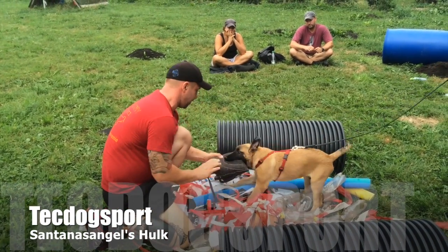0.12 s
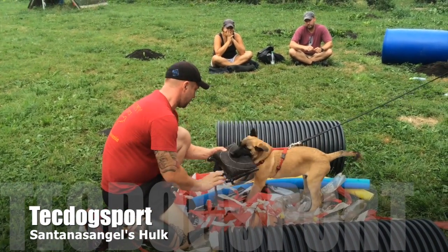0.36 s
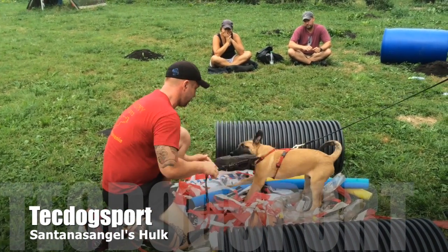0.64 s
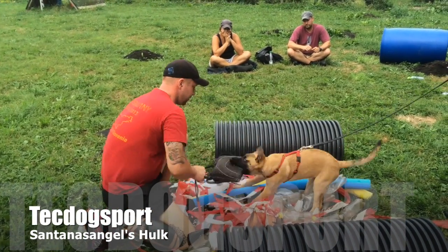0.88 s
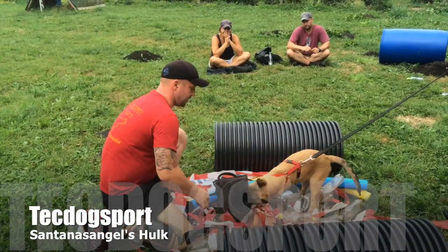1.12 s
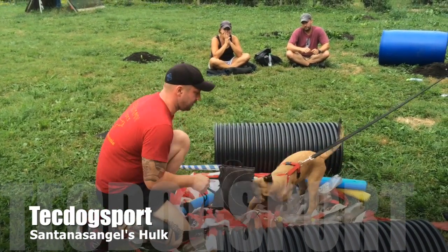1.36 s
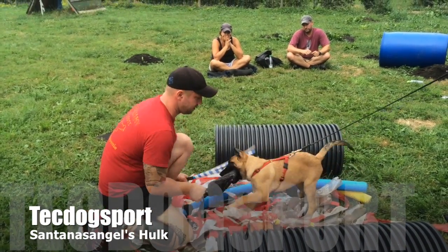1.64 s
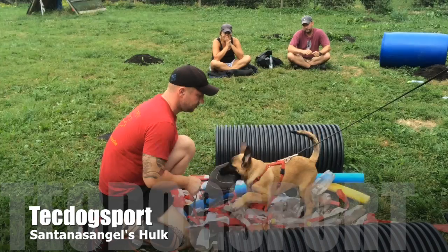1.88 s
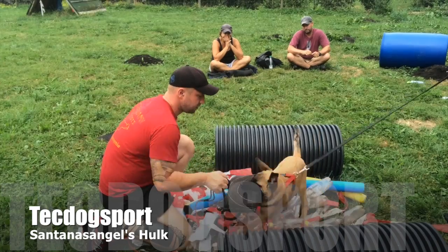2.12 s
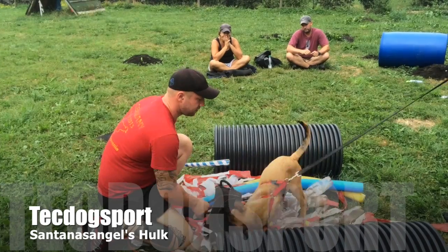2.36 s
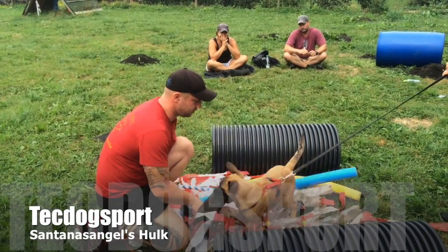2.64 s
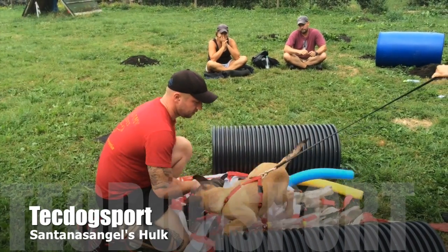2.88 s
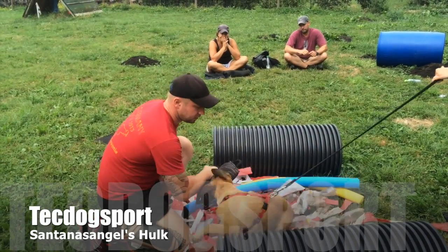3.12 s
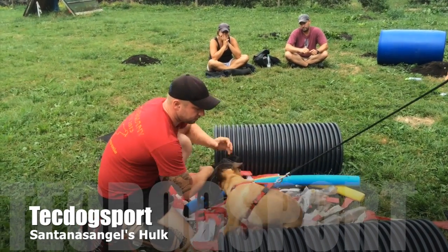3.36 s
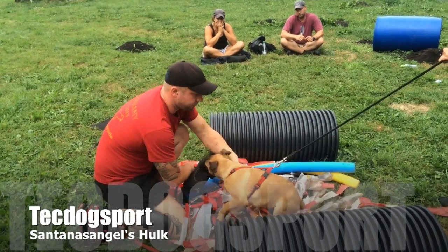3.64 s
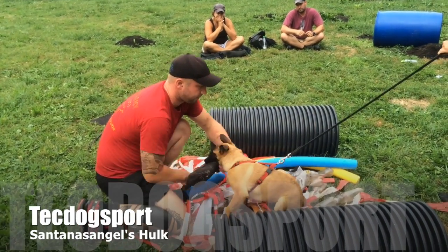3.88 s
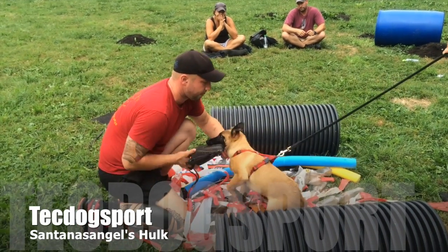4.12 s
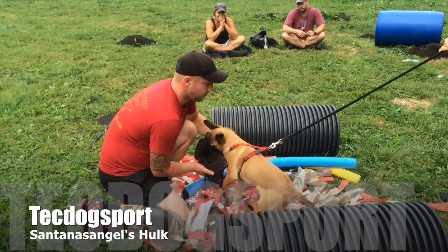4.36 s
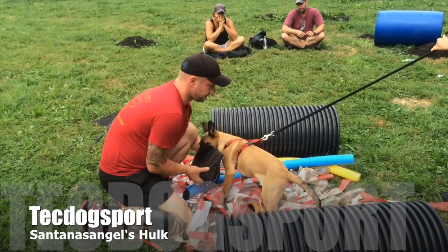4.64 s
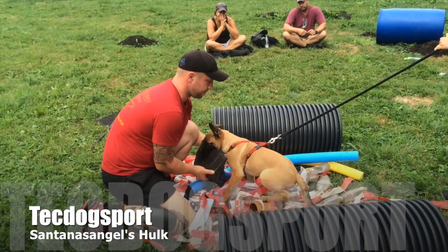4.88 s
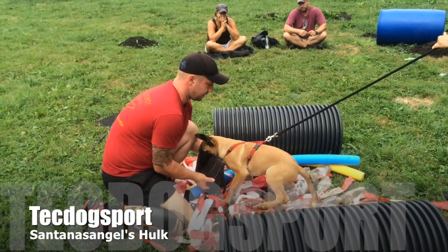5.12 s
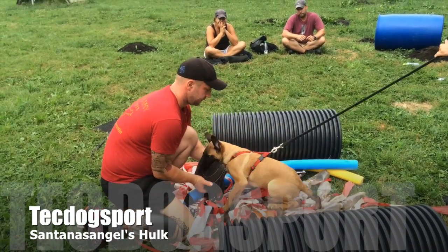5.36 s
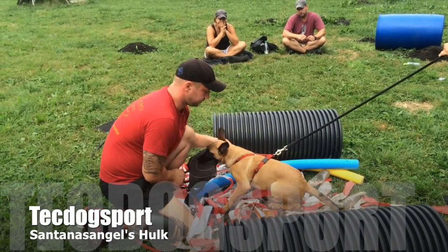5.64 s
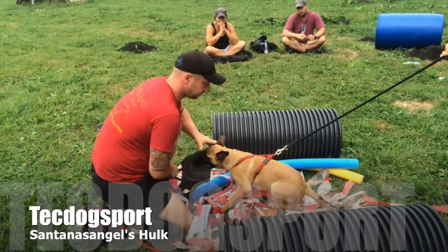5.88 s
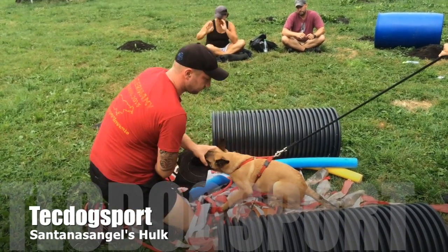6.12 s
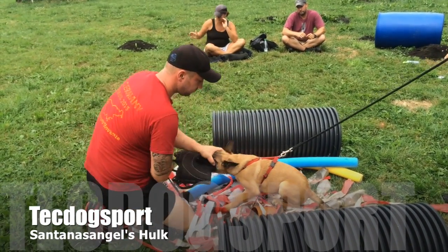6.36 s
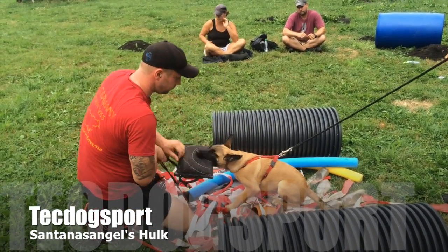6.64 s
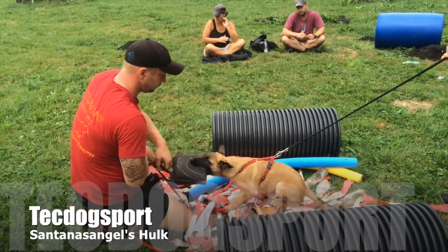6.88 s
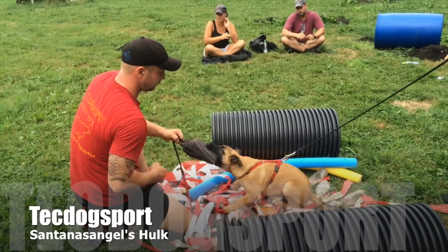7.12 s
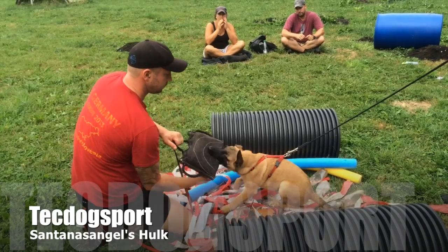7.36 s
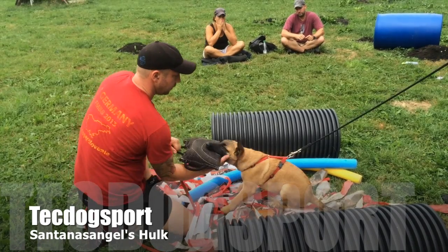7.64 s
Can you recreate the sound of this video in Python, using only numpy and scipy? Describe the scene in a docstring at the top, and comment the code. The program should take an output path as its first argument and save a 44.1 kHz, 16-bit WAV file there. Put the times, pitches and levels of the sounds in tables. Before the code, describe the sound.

Close outdoor sound of a dog on a pile of empty plastic bottles and sheeting. Faint rustling and soft scuffing come first, then hollow dents, bright snaps and four hard slaps build into dense crunching. It thins, flares once more, then falls to sparse light crackles with small clinks of the lead's clip.

```python
"""Dog trampling plastic bottles

A dog tramples a heap of empty plastic bottles and sheeting on grass while tugging at a toy.
Bottles dent with hollow rings and bright snaps, over a shifting rustle made of crackling noise and short knocks.
Four flat slaps push air and crack; the steel clip and ring of the lead clink as sums of fading sines.
Soft scuffing, a low breeze and faint hiss are coloured noise; the dents and clinks reflect once off the ground.
"""
import sys
import numpy as np
from scipy import signal
from scipy.fft import rfft, irfft
from scipy.io import wavfile
from scipy.ndimage import map_coordinates

SR = 44100
rng = np.random.default_rng(int(sys.argv[2]) if len(sys.argv) > 2 else 0)


def nominal_scale(level):
    """Amplitude ratio for a level in decibels (scalar or array-like)."""
    x = np.asarray(level, float) / 20
    return 10 ** x


def materialize(psi):
    """Save the field psi as 16-bit PCM at rate SR to the path in sys.argv[1].

    A 1-D psi becomes a single channel; in a 2-D psi each row is a channel.
    """
    bounded = np.clip(np.atleast_2d(psi).T, -1, 1)
    quanta = np.round(bounded * 32767).astype(np.int16)
    wavfile.write(sys.argv[1], SR, quanta)


N = 341334

# tone colour of bright cracks in plastic: pitch_hz, level_db (per Hz)
CRACK_COLOUR = [(500, -54), (1000, -2), (2100, -4.5), (3400, -1.5), (5000, -2), (8000, -5.5), (12000, -7),
                (15400, -16), (16000, -45)]
# tone colour of the hollow bottles: pitch_hz, level_db (per Hz)
HOLLOW_COLOUR = [(60, -50), (100, -11.5), (157, 2), (300, -5), (530, -4.5), (800, -10), (1100, -9.5),
                 (1600, -13), (2500, -17), (6000, -55)]


def unit(x):
    """Scale a sound to an average strength (rms) of 1."""
    return x / np.sqrt(np.mean(x ** 2) + 1e-20)


def wobble(rate):
    """A smooth random curve through this many random points a second."""
    points = rng.standard_normal(int(N * rate / SR) + 4)
    return map_coordinates(points, [np.arange(N) * rate / SR])


def coloured(x, spectrum):
    """Filter a sound to a tone colour, without sound ahead of its cause; white noise keeps its power."""
    size = 4096
    pitch_hz, level_db = np.transpose(spectrum)
    log_hz = np.log(np.fft.rfftfreq(size, 1 / SR) + 1)
    gain = nominal_scale(np.interp(log_hz, np.log(pitch_hz), level_db)) + 1e-6
    # folding the cepstrum puts the filter's energy as early as possible (minimum phase)
    cepstrum = irfft(np.log(gain))
    cepstrum[1:size // 2] *= 2
    cepstrum[size // 2 + 1:] = 0
    kernel = irfft(np.exp(rfft(cepstrum)))
    return signal.fftconvolve(x, kernel / np.linalg.norm(kernel))[:len(x)]


def add(track, start_s, sound):
    """Mix a sound into a track at a time, cut off at the track's end."""
    part = track[round(start_s * SR):][:len(sound)]
    part += sound[:len(part)]


def crackle(n, share, spread_db):
    """Noise in which a share of the samples stick out as tiny snaps, by at most spread_db."""
    noise = rng.standard_normal(n)
    pick = rng.random(n)
    size = rng.random(n) ** 2
    return unit(noise * np.where(pick < share, nominal_scale(spread_db * size), 1))


def dents():
    """A wall buckles in a short run of slips: they ring the bottle's hollow and snap brightly at the crease."""
    # one dent a row: start_s, level_db, hollow_hz, snap_db (over the hollow), crease_hz
    dent_list = [(0.955, -39.5, 218.3, -5, 5330), (1.01, -45, 1170, -1, 2750), (1.141, -58, 215, 14, 5360),
                 (1.19, -36.5, 340.6, -22, 2520), (1.238, -34.5, 1420, -3, 5760),
                 (1.285, -26, 640, -26.5, 2710), (1.33, -26, 1060, -18, 2560),
                 (1.337, -27.5, 458.4, -41, 2400), (1.479, -24, 893, -3, 2460), (1.52, -29, 1010, -3, 2500),
                 (1.929, -49.5, 660, 11.5, 1940), (2.044, -32, 301.5, 10, 3530),
                 (2.073, -28.5, 1250, 8, 2700), (2.09, -36, 1600, 6.5, 3540), (2.141, -22, 968, -18, 6400),
                 (2.182, -27, 850, -22.5, 2040), (2.218, -41, 380, 2.5, 3570),
                 (2.26, -26.5, 670, -36.5, 2860), (2.303, -25, 513, -32, 1960),
                 (2.35, -31.5, 428, -26.5, 1920), (2.386, -26.5, 327, -7.5, 6000),
                 (2.436, -25.5, 436, -8.5, 1890), (2.534, -29.5, 422, -23, 3040),
                 (2.598, -40, 431, -19.5, 2990), (2.896, -38, 1510, 9.5, 3860),
                 (2.92, -21, 557, -15.5, 4780), (2.969, -25, 920, -23, 1880), (3.045, -26, 1010, -8, 3110),
                 (3.054, -15, 1160, -20, 1970), (3.064, -21.5, 640, -22, 2060),
                 (3.089, -25, 546, -4.5, 2020), (3.177, -22, 404, -7, 1890), (3.267, -33, 536, -25.5, 1970),
                 (3.32, -32.5, 333, -5, 2640), (3.426, -37, 1190, -2, 6800), (3.439, -22, 424, -5.5, 1900),
                 (3.471, -32, 212, -23, 5180), (3.567, -25, 786, -5.5, 1875),
                 (3.571, -18.5, 1567, -6, 2050), (3.918, -39, 283, -8, 2500),
                 (4.029, -37.5, 205, -11, 6920), (4.074, -37, 330, -11.5, 6400),
                 (4.122, -39, 417, -19, 3240), (4.356, -37, 192.2, -10, 2610), (4.502, -28, 1130, -6, 2670),
                 (4.655, -44, 370, -22, 2550), (4.712, -46, 240, -7, 1960), (4.781, -36.5, 1230, 1.5, 2820),
                 (4.815, -34.5, 413, -16, 4420), (4.915, -33, 189.7, -17, 2070),
                 (4.956, -36.5, 409.4, -6, 7000), (5.016, -40, 470, 2.5, 4160),
                 (5.114, -28.5, 1120, -3, 2984), (5.116, -21, 1087, -26, 1900),
                 (5.143, -30.5, 479, -14, 1900), (5.162, -31, 528, -24, 5820),
                 (5.209, -27.5, 257, -3, 2130), (5.305, -32.5, 475, -19.5, 1900),
                 (5.351, -39, 519, -22, 1900), (5.363, -35, 1028, -21, 3840),
                 (5.743, -51, 388, -10.5, 2720), (6.612, -49.5, 460, 22, 3840), (6.647, -64, 226, 13, 2860),
                 (6.732, -60, 289, 10, 2830), (6.756, -53.5, 224.6, 6, 3360),
                 (6.836, -54.5, 998.5, -0.5, 2531), (7.301, -45, 1037, -5.5, 2790),
                 (7.431, -35.5, 1640, -4.5, 2280)]
    hollow, snaps = np.zeros(N), np.zeros(N)
    t = np.arange(SR // 4) / SR

    def ringing(hz, cycles):
        """A tone that falls by 60 dB within some cycles."""
        return nominal_scale(-60 * t * hz / cycles) * np.cos(2 * np.pi * hz * t)

    for start_s, level_db, hollow_hz, snap_db, crease_hz in dent_list:
        life_s = 0.076 * (600 / hollow_hz) ** 0.1  # deeper dents last a little longer
        fade_in = 1 - np.exp(-t / (0.017 * life_s))
        slips = crackle(len(t), 0.0075, spread_db=24.0) * nominal_scale(-60 * t / life_s) * fade_in

        # the main panel tone keeps its pitch; weaker neighbours are randomly detuned
        detune_db = rng.normal(0, 1.0, 4) * [1, 0, 1, 1]
        ratios = np.array([.6, 1, 1.6, 2.4]) * nominal_scale(detune_db)
        mode_db = (-13.0, 0.5, -9.5, -14)
        body = sum(nominal_scale(db) * ringing(hollow_hz * r, cycles=17.1) for r, db in zip(ratios, mode_db))
        ring = signal.fftconvolve(slips, body)[:len(t)]
        add(hollow, start_s, nominal_scale(level_db - 2.52) * ring / np.max(np.abs(ring)))

        # a slower fade plus a burst that falls by 60 dB in 12 ms
        snap_fade = nominal_scale(-60 * t / (0.42 * life_s)) + 1.2 * nominal_scale(-60 * t / 0.012)
        snap = crackle(len(t), 0.026, spread_db=23) * snap_fade * (1 - np.exp(-t / 0.00057))
        snap *= nominal_scale(level_db + snap_db + 11.5) / np.linalg.norm(snap)
        add(snaps, start_s, snap)

        crease = ringing(crease_hz, cycles=19)
        crease_ring = signal.fftconvolve(snap, crease / np.linalg.norm(crease))[:len(t)]
        add(hollow, start_s, nominal_scale(1.5) * crease_ring)
    return hollow + coloured(snaps, CRACK_COLOUR)


def slaps():
    """A graze, trapped air shoved out in one or two pushes, then a broad crack that booms in the bottles."""
    # one slap a row: push_s, push_db, fore_push_share (0-1), crack_db, crack_delay_ms, boom_db
    slap_list = [(1.7934, -11.5, 1, -14, 2.4, -22), (2.0152, -6.5, 0.44, -20, 1.2, -28.5),
                 (2.7378, -7.5, .55, -17.5, 1.9, -27), (3.0016, -5.5, 0, -17, 0.33, -17)]
    pushes, cracks, booms = np.zeros(N), np.zeros(N), np.zeros(N)
    t = np.arange(SR // 4) / SR
    lead_s = .006  # room for the graze ahead of the main push
    ms = (t - lead_s) * 1000

    def bump(at_s, width_s):
        """A smooth pulse of air pressure, timed from the main push."""
        return np.exp(-((t - lead_s - at_s) / width_s) ** 2)

    for push_s, push_db, fore_share, crack_db, delay_ms, boom_db in slap_list:
        main_push = bump(0, 0.00023) - .5 * bump(0.0012, 0.00041)
        fore_push = bump(-0.00049, 0.00044) - 1.15 * bump(-0.00033, .00015)
        push = main_push + fore_share * fore_push

        # the stronger the fore-push, the later the graze begins
        graze = nominal_scale(-15.0) * (ms > -5.2 + 3.8 * fore_share)
        swell = np.maximum(graze, 1 / (1 + np.exp((delay_ms - ms) / 0.27)))
        fading_ms = np.clip(ms - delay_ms - 7.5, 0, None)
        shape = swell * (nominal_scale(-2.2 * fading_ms) + nominal_scale(-4.0 - 0.65 * fading_ms))  # quick fall, slow rattle

        begin_s = push_s - lead_s
        add(pushes, begin_s, nominal_scale(push_db) * push)
        add(cracks, begin_s, nominal_scale(crack_db - 6.5) * shape * crackle(len(t), 0.088, spread_db=22.0))
        add(booms, begin_s, nominal_scale(boom_db - 3.5) * shape * crackle(len(t), 0.0033, spread_db=19))
    return pushes + coloured(cracks, CRACK_COLOUR) + coloured(booms, HOLLOW_COLOUR)


def heap():
    """Countless small shifts: bottles knock hollow, the sheeting crinkles and ticks; both in uneven flurries."""
    # tone colour of the sheeting: pitch_hz, level_db (per Hz)
    sheet_colour = [(590, -29), (1000, -5.5), (1890, -5), (2170, -7), (2860, -3.5), (3210, -5.5),
                    (6880, -6), (13900, -12), (15400, -16.5), (15900, -54)]
    bottle_gain, sheet_gain = restlessness()
    flurry = wobble(40)  # shared by bottles and crinkling

    jostle = knocks(330, 139.3, 12.88, cycles=22.7, spread_db=12.5)
    jostle = jostle + nominal_scale(8.0) * crackle(N, 0.0044, spread_db=22)
    bottle_flurry = nominal_scale(2.5 * flurry + 1.79 * wobble(90))
    hollow = unit(bottle_flurry * coloured(jostle, HOLLOW_COLOUR))

    sheet_flurry = nominal_scale(1.8 * flurry + 1.8 * wobble(200))
    crinkle = unit(sheet_flurry * coloured(crackle(N, 0.012, spread_db=16.5), sheet_colour))
    # single creases of the sheeting, set against its crinkle
    ticks = nominal_scale(-10.5) * knocks(70, 2500, 4.8, cycles=19, spread_db=13.5)
    return bottle_gain * hollow + sheet_gain * (crinkle + ticks)


def restlessness():
    """Loudness of bottles and sheeting: the heap settles, and surges as the dog shifts its weight."""
    # the heap never quite settles: time_s, bottles_db, sheeting_db
    settling = [(0, -73, -67), (.65, -72.5, -70), (1.1, -63.5, -59), (1.75, -64.5, -58.5),
                (2.2, -61, -56.5), (2.85, -66, -55), (3.37, -57, -64.5), (3.75, -61.5, -61.5),
                (4.28, -63.5, -63), (4.64, -72.5, -66), (5.2, -55, -59.5), (5.6, -71.5, -69.5),
                (5.77, -80, -78), (6.4, -72.5, -65.5), (6.95, -79, -79.5), (7.55, -67, -66.5),
                (7.74, -72.5, -84.5)]
    # one surge a row: crest_s, build_s and die_s (time for 20 dB, at least quickest_s), bottles_db, sheeting_db
    shifts = [(.02, .1, 0.19, -61.5, -56.5), (.33, 0.19, -0.16, -62.5, -64), (.48, -0.3, .04, -77, -66),
              (.73, .1, .12, -63.5, -64), (.83, 0.1, -0.4, -76.5, -61), (.965, 0.08, .06, -60, -52.5),
              (1.02, 0.06, 0.14, -66, -50.5), (1.166, 0.01, 0.19, -60, -46.5),
              (1.24, .07, 0.14, -54.5, -46), (1.3, 0.01, 0.13, -44, -49.5),
              (1.34, 0.007, 0.12, -42.5, -53.5), (1.499, 0.013, 0.08, -41.5, -43.5),
              (1.813, 0.0233, 0.016, -28, -46), (1.86, 0.11, 0.05, -42.5, -42.5),
              (2.022, 0.25, 0.4, -52.5, -55.5), (2.17, 0.03, 0.37, -47.5, -52),
              (2.31, 0.09, 0, -42.5, -73.5), (2.43, -0.0237, 0.09, -40, -38),
              (2.58, 0.14, 0.14, -42.5, -48.5), (2.755, 0.11, 0.14, -45.5, -42),
              (2.92, 0.16, 0.2, -50.5, -52.5), (2.999, .03, 0.0658, -33, -51),
              (3.07, .06, 0.11, -32.5, -42.5), (3.188, 0.0245, 0.0832, -36, -45.5),
              (3.321, -0.4, 0.03, -42.5, -66.5), (3.441, .03, 0.17, -49, -47), (3.53, 0, 0.01, -44.5, -67),
              (3.573, 0.04, 0.0535, -29.5, -45), (3.92, 0.3, 0.1424, -57.5, -56.5),
              (4.089, .17, 0.24, -52, -53.5), (4.38, 0.3, 0.17, -57, -71),
              (4.492, 0.0643, 0.11, -47, -45.5), (4.81, .13, 0.15, -49.5, -48.5),
              (5.03, .05, 0.03, -45, -43.5), (5.131, 0.09, 0.063, -39.5, -54.5),
              (5.221, 0.06, 0.0426, -37.5, -50), (5.35, 0.18, 0.0849, -42.5, -53.5),
              (5.51, 0.4, 0.13, -60, -61), (5.901, 0.2, .12, -67.5, -60.5), (6.06, 0.35, 0.04, -68, -58.5),
              (6.27, 0.15, 0.23, -62, -63), (6.48, 0.2077, 0.28, -67.5, -60), (6.63, .03, 0.23, -75.5, -65),
              (7.12, 0.2455, .2, -73, -61), (7.28, 0.2, 0.1932, -62.5, -58.5), (7.44, 0.1, 0.23, -59, -63),
              (7.512, 0.14, 0.03, -68, -55), (7.65, 0.14, 0, -68, -57.5)]
    quickest_s = .03
    roundness = 1.4  # 1 = pointed crest, more = flatter top and steeper flanks

    t = np.arange(0, N / SR + .002, .001)
    time_s, *settling_db = np.transpose(settling)
    crest_s, build_s, die_s, *surge_db = np.transpose(shifts)[:, :, None]
    after = (t - crest_s) / np.maximum(die_s, quickest_s)
    before = (crest_s - t) / np.maximum(build_s, quickest_s)
    fade_db = -20 * np.maximum(after, before) ** roundness

    gains = []
    for low_db, high_db in zip(settling_db, surge_db):
        settling_power = nominal_scale(2 * np.interp(t, time_s, low_db))
        surge_power = nominal_scale(2 * (high_db + fade_db)).sum(axis=0)
        gain = np.sqrt(settling_power + surge_power)
        gains.append(np.interp(np.arange(N) / SR, t, gain))
    return gains


def knocks(rate, low_hz, span, cycles, spread_db):
    """Bumps at random moments, rate a second, each a short ring pitched from low_hz to span times that."""
    draws = rng.random((round(rate * N / SR), 3))  # moment, pitch, strength
    start = (draws[:, 0] * N).astype(int)
    hz = (low_hz * span ** draws[:, 1])[:, None]
    t = np.arange(SR // 25) / SR
    turns = hz * t
    level = nominal_scale(spread_db * draws[:, 2:] - 60 * turns / cycles)
    # higher rings are stronger so that every pitch carries alike power per Hz
    rings = hz * level * np.sin(2 * np.pi * turns) * np.tanh(turns / 1.3)
    places = start[:, None] + np.arange(len(t))
    return unit(np.bincount(places.ravel(), rings.ravel(), N + len(t))[:N])


def lead_steel():
    """The clip of the lead clinks low, the harness ring jingles high."""
    clinks = [(1.48, -34, 2000), (1.5, -37, 2100), (4.781, -45.5, 1830), (5.025, -42, 1700),
              (5.372, -39, 2930), (5.446, -48.5, 2310), (6.27, -57, 1800), (7.43, -39.5, 1680),
              (7.451, -46.5, 2230)]
    jingles = [(2.146, -36, 5300), (3.075, -45.5, 7537), (3.088, -42, 9500), (3.1, -46, 11670),
               (3.113, -43.5, 6860), (3.132, -51, 8200), (3.168, -55, 6330), (3.185, -45, 8200),
               (3.222, -57, 6300), (5.018, -40, 4600), (5.022, -37, 6840), (5.024, -46, 11200)]
    clip_tones = [(1620, -7, .2), (1720, 0, .15), (2347, -9, .08), (3000, -12, .07), (3844, -2, .16),
                  (6261, -10, .07)]
    ring_tones = [(4400, 0, .09), (6300, -2, .14), (7600, 0, .08), (8250, -3, .13), (9420, 0, .1),
                  (10630, -5, .09), (11400, -4, .07), (12540, -4, .09)]
    return metal(clinks, clip_tones, reach_db=12.0) + metal(jingles, ring_tones, reach_db=37.0)


def metal(touches, modes, reach_db):
    """Each touch rings a steel part; tones lose reach_db per octave away from the region it excites."""
    out = np.zeros(N)
    t = np.arange(SR // 4) / SR
    for start_s, touch_db, centre_hz in touches:
        luck_db = rng.normal(0, 4.1, len(modes))
        sound = np.zeros(len(t))
        for (hz, mode_db, t60_s), chance_db in zip(modes, luck_db):
            distance_db = reach_db * abs(np.log2(hz / centre_hz))
            level_db = touch_db + mode_db + chance_db - distance_db
            sound += nominal_scale(level_db - 60 * t / t60_s) * np.sin(2 * np.pi * hz * t)
        add(out, start_s, sound)
    return out


def scuff():
    """Something soft drags unevenly over the grass: crackling noise in the middle pitches."""
    # loudness over time: time_s, level_db
    loudness = [(0, -62.5), (.2, -64), (.36, -65.5), (.42, -73), (7.05, -90.5), (7.2, -70), (7.4, -64.5),
                (7.62, -71.5), (7.74, -85.5)]
    # tone colour: pitch_hz, level_db (per Hz)
    scuff_colour = [(400, -40.5), (750, -4), (1000, 1.5), (1250, -1), (1550, 0.5), (2200, -9), (3500, -31)]
    time_s, level_db = np.transpose(loudness)
    gain = nominal_scale(np.interp(np.arange(N) / SR, time_s, level_db) + 2.5 * wobble(38))
    return gain * unit(coloured(crackle(N, 0.0037, spread_db=12), scuff_colour))


def air():
    """Low breeze and far hiss: coloured noise, gently unsteady."""
    # tone colour: pitch_hz, level_db (per Hz)
    air_colour = [(24, -32), (40, 15), (130, 5.5), (296, -7.5), (362, -8.5), (553, -15), (1360, -14.5),
                  (3110, -20.5), (6420, -28.5), (13600, -32), (15400, -24), (15900, -66)]
    gain = nominal_scale(-61.5 + 0.4 * wobble(2.1))
    return gain * unit(coloured(rng.standard_normal(N), air_colour))


def scene():
    """All sources; the dents and clinks arrive once more off the ground, later and weaker."""
    near = dents() + lead_steel()
    bounce = 97  # samples, about 2.2 ms
    reflection = nominal_scale(-18) * np.pad(near, (bounce, 0))[:N]
    return (near + reflection + heap() + slaps() + scuff() + air())[None]


def band_limit(x):
    """A steep low-pass at the top of the band."""
    return signal.sosfilt(signal.butter(12, 16310, fs=SR, output="sos"), x)


def record(dry):
    """The microphone weakens the deep bass and rounds off the loudest peaks."""
    bass_cut = signal.butter(2, 88, "highpass", fs=SR, output="sos")  # Hz
    heard = signal.sosfilt(bass_cut, dry)
    rounded = heard / (1 + (heard / .45) ** 4) ** (1 / 4)  # never exceeds .45
    return band_limit(rounded)


dry = scene()
out = record(dry)
materialize(out)
```